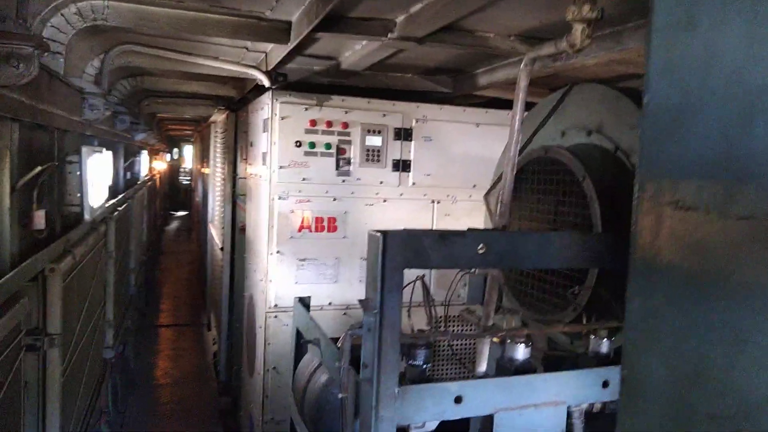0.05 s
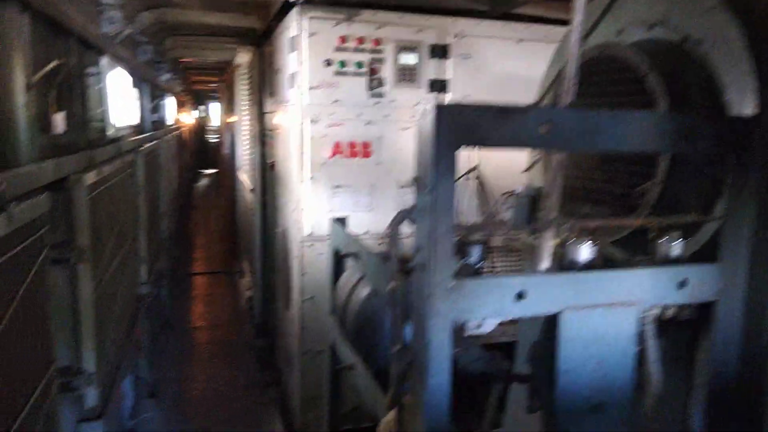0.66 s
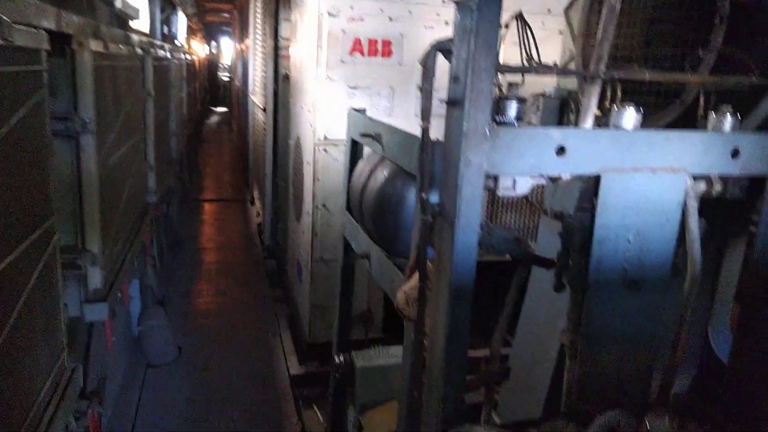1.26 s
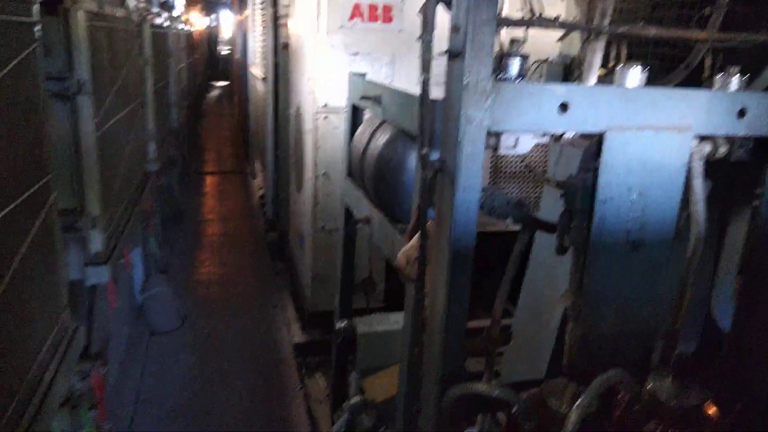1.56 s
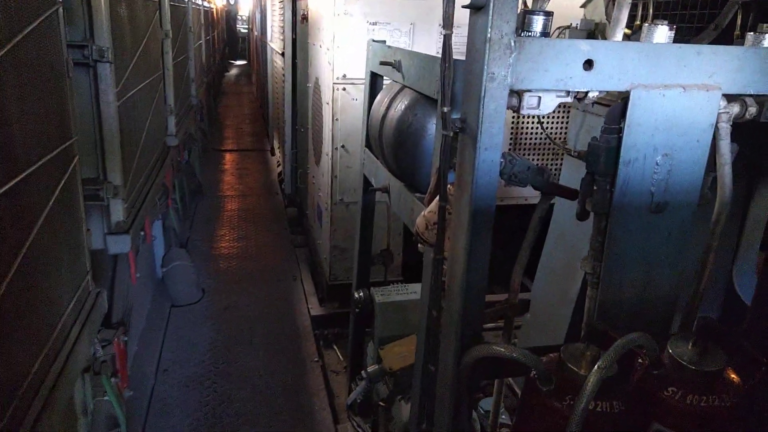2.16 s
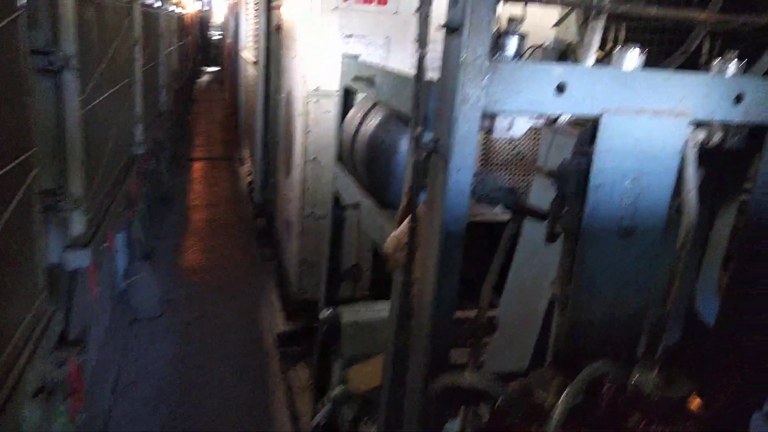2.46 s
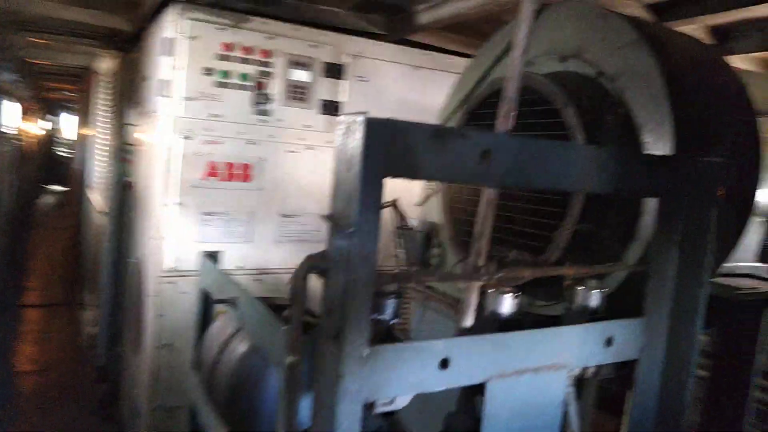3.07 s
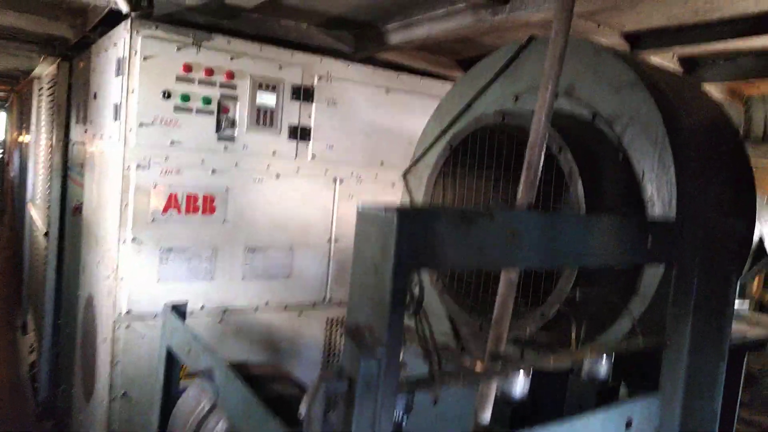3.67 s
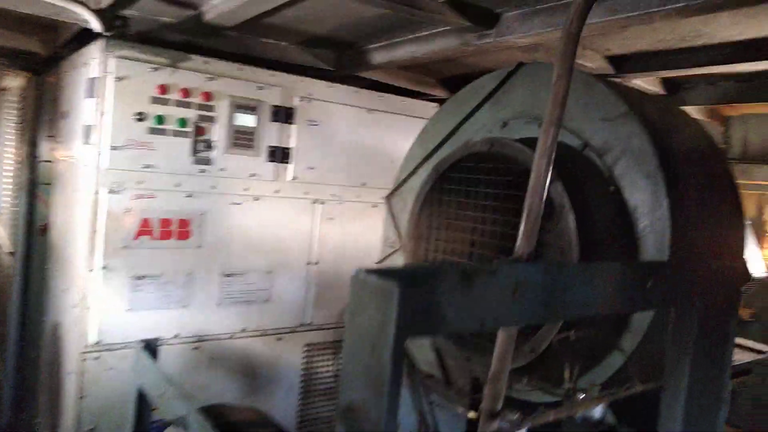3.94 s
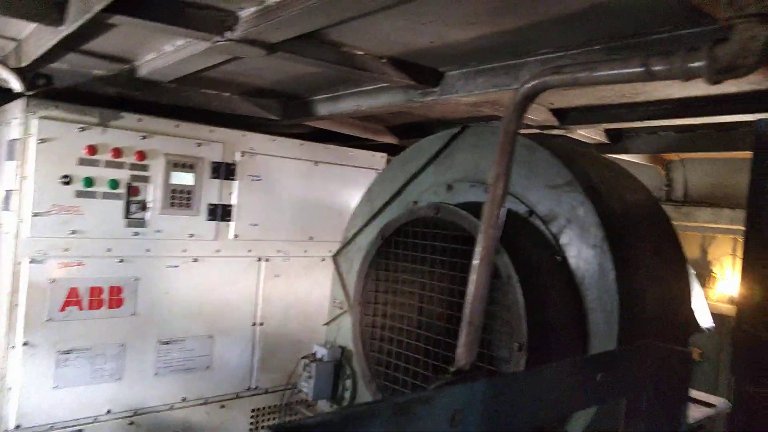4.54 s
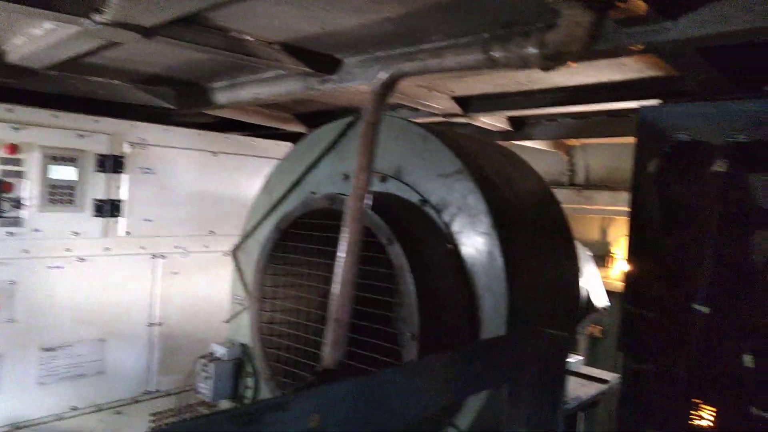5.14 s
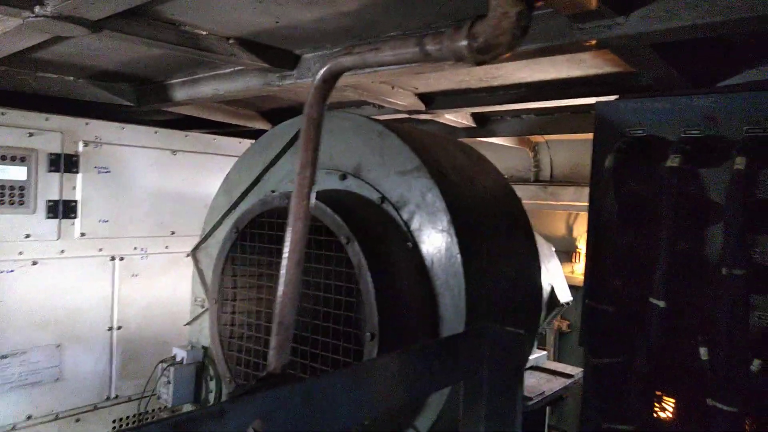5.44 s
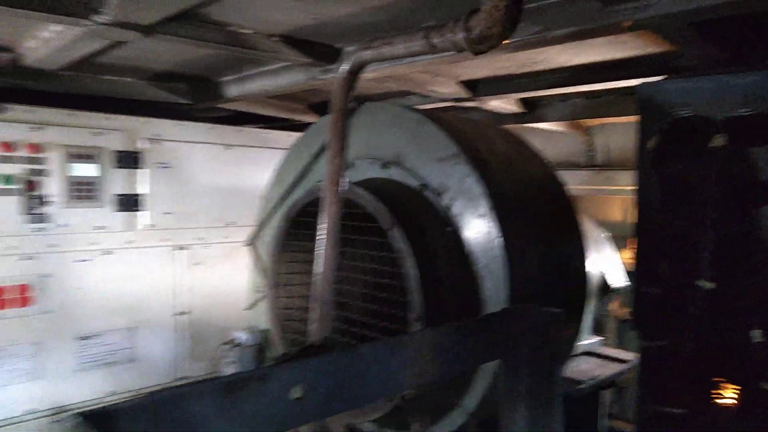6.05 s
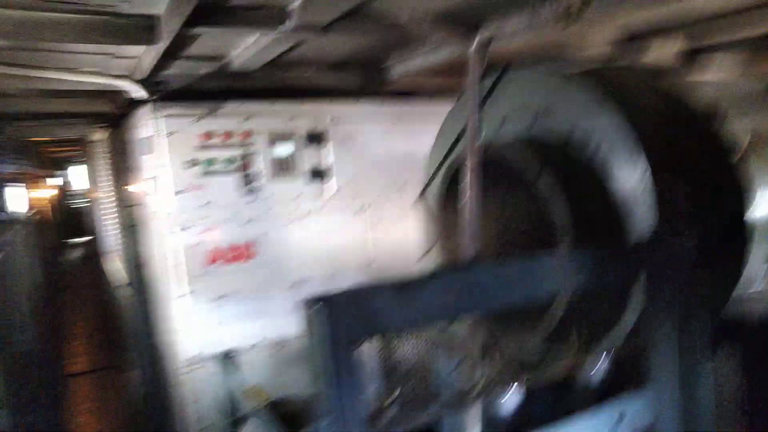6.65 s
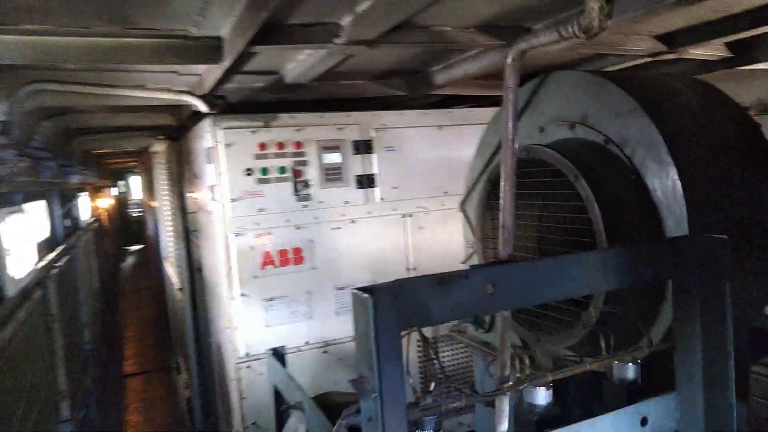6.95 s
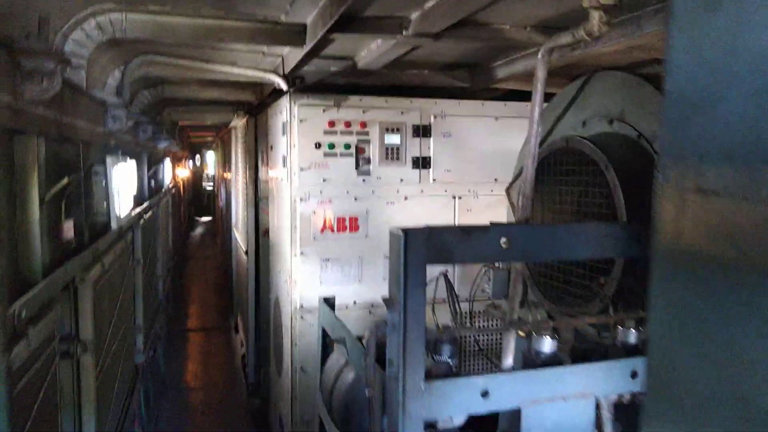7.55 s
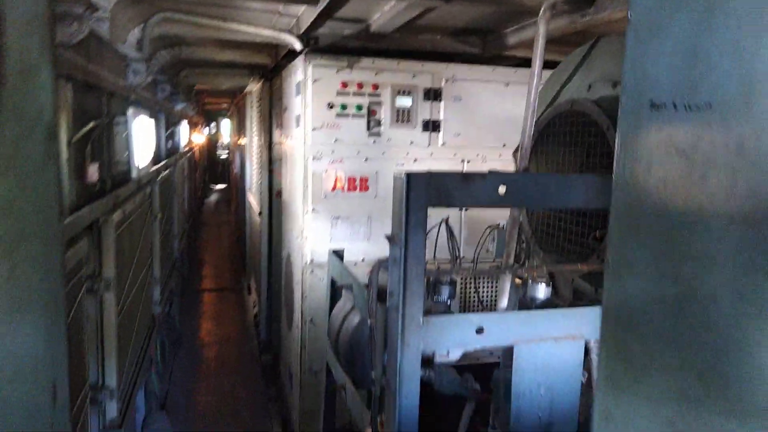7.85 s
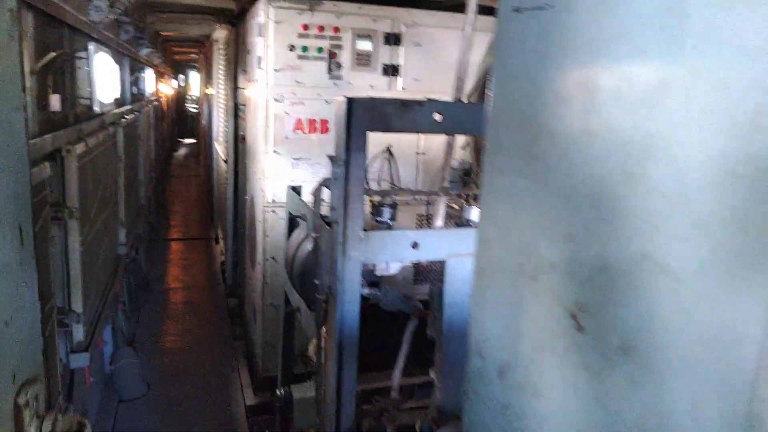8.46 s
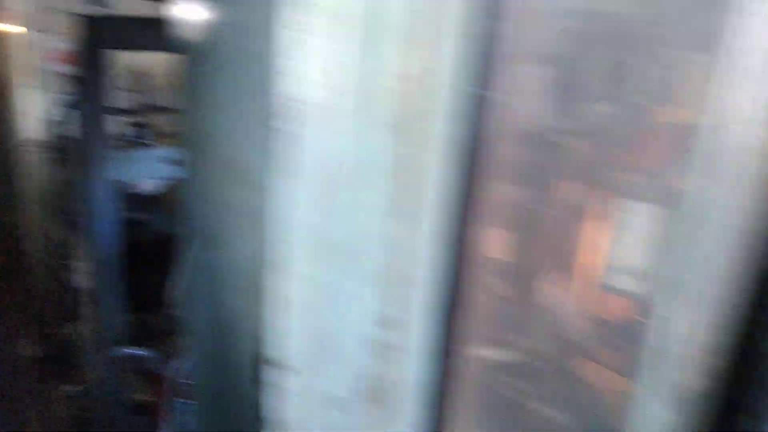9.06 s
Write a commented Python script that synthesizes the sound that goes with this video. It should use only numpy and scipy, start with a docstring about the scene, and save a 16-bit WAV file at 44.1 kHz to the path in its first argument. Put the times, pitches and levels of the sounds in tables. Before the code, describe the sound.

Big blowers roar and drone without a break inside the machine room of an electric locomotive. An air duct whistles unsteadily, swelling and fading. Underneath lie an electrical hum and a gear whine that slowly sinks in pitch, while a loose metal fitting chatters, thin and high. The close, wide stereo microphone is carried about, so the tone of the roar shifts as it moves.

```python
"""Machine room of an electric locomotive

Big blowers roar and drone, and one of their air ducts whistles. Under them lie a mains hum and a
slowly falling gear whine, while a loose metal fitting chatters, thin and high. As the microphone
is carried about, the steel room's standing waves (fixed loud and quiet spots) colour the sound.
A close pair of microphones hears it all, and the stereo image is widened."""
import sys
import numpy as np
from scipy import signal
from scipy.fft import rfft, irfft
from scipy.io import wavfile
from scipy.ndimage import uniform_filter1d

SR = 44100
rng = np.random.default_rng(int(sys.argv[2]) if len(sys.argv) > 2 else 0)


def generate_wav(signal):
    """Clip the signal to [-1, 1] and save it as 16-bit WAV at the path in sys.argv[1]."""
    frames = np.transpose(np.atleast_2d(signal))
    scaled = np.clip(frames, -1, 1) * 32767
    pcm = np.round(scaled).astype(np.int16)
    wavfile.write(sys.argv[1], SR, pcm)


N = 410571
T = np.arange(N) / SR
HZ = np.fft.rfftfreq(N, 1 / SR)
SLOW_T = np.linspace(0, N / SR, 400)  # coarse times [s] for things that change slowly
SHAFT_HZ = 23.56  # turns of the main blower each second


def gain_of(db):
    """Turn decibels into a number to multiply by."""
    return 10 ** (np.asarray(db) / 20)


def unit_rms(x):
    """Scale a signal so that its average strength (rms) is 1."""
    return x / np.sqrt(np.mean(x ** 2) + 1e-20)


def at_time(table, t):
    """Look up a table at the times t, joining its points with straight lines."""
    return np.interp(t, *np.transpose(table))


def at_hz(table, hz):
    """Look up a table by frequency, on a logarithmic scale."""
    f, value = np.transpose(table)
    return np.interp(np.log(hz + 1), np.log(f + 1), value)


def swing(table, t):
    """How far a table is above or below its average at the times t."""
    value = at_time(table, t)
    return value - value.mean()


def bell(hz, centre, width):
    """The peak of one resonance: 1 at its centre, less on either side."""
    return 1 / (1 + (2 * (hz - centre) / width) ** 2)


def band(hz, centre, width):
    """A flat-topped hump over frequency, 1 at its centre."""
    return np.exp(-(2 * (hz - centre) / width) ** 4 / 2)


def drift(top_hz):
    """A smooth random wobble, made of slow waves no faster than top_hz."""
    speeds = top_hz * np.geomspace(.1, 1, 12)[:, None]
    return unit_rms(np.sin(2 * np.pi * (speeds * SLOW_T + rng.random(speeds.shape))).sum(0))


def patches(shape, bins, frames):
    """Smooth random patches over frequency (bins) and time (frames)."""
    field = rng.standard_normal(shape)
    for _ in range(2):
        field = uniform_filter1d(field, bins, 0, mode="wrap")
        field = uniform_filter1d(field, frames, 1, mode="wrap")
    return unit_rms(field)


# The walk up to the blower's air inlet and back: (time [s], nearness [0-1])
NEARNESS = [(0, 0.16), (1, 0.3), (2.5, 0.57), (3.3, 1), (4.1, 0.4), (5.1, 0.78), (6.0, 0.77), (6.45, 0.97),
            (6.95, 0.5), (8.4, 0.02), (9.31, 0.04)]
# The microphone dips toward the floor and rises again: (time [s], lowness [0-1])
LOWNESS = [(0, 0.03), (.55, 0.6), (1.5, 1), (1.95, 0.9), (3, 1), (3.8, 0.5), (4.9, 0.3), (7, 0),
           (8.5, 0.28), (9.31, 0.3)]
# The microphone turns toward the inlet, then away: (time [s], facing [0-1])
FACING = [(0, 0.4), (2.5, 0), (3.2, 0.54), (4.1, 0.5), (4.7, 0.94), (5.3, 0.67), (6.2, 1), (6.65, 0.4),
          (7, 0.1), (9.31, .1)]
# Standing waves: (frequency [Hz], width [Hz], change from far to near [dB], from high to low [dB])
STANDING_WAVES = [(136, 52, -5.5, -4.5), (182.6, 12, -3, -5), (210, 30, -1, 2), (240, 37, -12.5, -4),
                  (331, 44, -4, 18.5), (428, 19, -8, -1), (670, 88, 3.5, -2), (740, 26, -5, 1),
                  (799, 27, -1, -5.5), (983, 37, 5, -14.5), (1137, 95, 4.5, -3)]
# Drones that the inlet beams forward: (frequency [Hz], width [Hz], boost on turning to face it [dB])
INLET_DRONES = [(485, 39, 11.5), (693, 136, 3.5)]
# How the singing duct swells and fades, scaled where used: (time [s], relative level [dB])
DUCT_SONG = [(0.0, -20), (0.37, -23.5), (0.75, -25), (0.85, -15.5), (1.5, -17.5), (2.0, -23.5), (2.65, -27),
             (2.8, -15), (2.95, -16.5), (3.15, -25), (3.64, -16.5), (4.29, -25), (5.51, -21), (6.26, -19.5),
             (6.45, -29), (7.11, -27), (8.3, -25.5), (8.5, -18), (8.81, -15.5), (9.29, -18.5)]
# The same for a rush of air just above it in pitch: (time [s], relative level [dB])
DUCT_RUSH = [(0.0, -21), (0.41, -18.5), (3.16, -18.5), (3.71, -14), (4.29, -15), (4.9, -21), (8.2, -20.5),
             (8.81, -20.5), (9.29, -24)]


def colour_shift_db(t, hz):
    """Standing waves and inlet drones follow the microphone; the duct's song and rush come and go."""
    near, low = swing(NEARNESS, t), swing(LOWNESS, t)
    waves_db = sum(band(hz, f, width) * (near_db * near + low_db * low)
                   for f, width, near_db, low_db in STANDING_WAVES)
    inlet_db = swing(FACING, t) * sum(db * band(hz, f, width) for f, width, db in INLET_DRONES)
    song_db = .59 * swing(DUCT_SONG, t) * band(hz, centre=819, width=45)
    rush_db = .95 * swing(DUCT_RUSH, t) * band(hz, centre=903, width=105)
    return waves_db + inlet_db + song_db + rush_db


# The two microphones face different machines: (frequency [Hz], left minus right [dB])
BALANCE = [(100, 1), (220, -1.5), (350, -3), (500, -4.5), (800, -3.5), (1200, -1), (1800, 4), (3000, 9.5),
           (4300, 2.5), (6000, 9.5), (8000, -3), (10400, -3), (12500, -2), (15000, 5)]
# How far a tone on the left runs ahead of the right: (frequency [Hz], lead [radians])
LEFT_LEAD = [(70, 1.9), (95, 1.1), (165, 1.06), (210, 0.08), (1000, 0.27)]


def tone(cycles, hz, db, echo=.35):
    """One tone in stereo. Its echoes add and cancel as the microphone moves, more so for short waves."""
    shortness = np.sqrt(min(hz, 1000) / 500)
    echoes = echo * (drift(1.3) + 1j * drift(1.3))  # complex numbers hold both strength and phase
    turbulence = .17 * (drift(14) + 1j * drift(14))
    sway = 1 + shortness * (echoes + turbulence) / np.sqrt(2)
    strength = np.sqrt(2) * gain_of(db) * sway / np.sqrt(np.mean(abs(sway) ** 2))
    lead = at_hz(LEFT_LEAD, hz) + .65 * shortness * drift(.475)
    wave = np.exp(2j * np.pi * (cycles + rng.random()))
    sides = [strength * gain_of(side * at_hz(BALANCE, hz)) * np.exp(1j * side * lead)
             for side in (.5, -.5)]
    return np.array([(np.interp(T, SLOW_T, side) * wave).real for side in sides])


# Steady tones of the transformer and small fans: (frequency [Hz], level [dB])
HUM_TONES = [(100.1, -60), (131.7, -73), (300.1, -39.5), (394.9, -59), (996, -45), (1457, -47)]


def hum(room_share=.28):
    """The transformer and small fans stand elsewhere, so the standing waves sway them less."""
    return sum(tone(hz * T, hz, db + room_share * colour_shift_db(SLOW_T, hz)) for hz, db in HUM_TONES)


# How often the gear teeth meet: (time [s], rate [Hz])
TOOTH_RATE = [(0, 276), (2, 270.5), (5, 263), (7, 258), (9.31, 253)]
# How loud the gears are: (time [s], level [dB])
GEAR_LEVEL = [(0, -36), (.7, -32.5), (1.6, -28), (2.6, -37), (3.8, -46), (5, -37), (6, -39), (6.8, -29),
              (7.5, -41), (8.2, -31), (9.31, -54)]
# The tones in the whine: (multiple of the tooth rate, relative level [dB])
GEAR_TONES = [(1, 0), (2, -6), (3, -7)]


def gear_whine():
    """Gear teeth meet so fast that they make a tone, which sinks as the train slows."""
    cycles = np.cumsum(at_time(TOOTH_RATE, T)) / SR
    level_db = at_time(GEAR_LEVEL, SLOW_T)
    start_hz = TOOTH_RATE[0][1]
    return sum(tone(k * cycles, k * start_hz, level_db + db) for k, db in GEAR_TONES)


# Taps of the loose fitting at set times: (time [s], relative level [dB])
SET_TAPS = [(0.0558, -26), (0.2465, -25), (0.2952, -25), (0.385, -28), (0.5501, -27), (0.6439, -27),
            (0.7307, -29), (0.921, -28), (1.0894, -30), (1.1533, -27), (1.2406, -29), (1.3224, -26),
            (1.5943, -25), (1.6531, -26), (1.7679, -26), (1.8552, -27), (2.0053, -24), (2.1071, -24),
            (2.163, -28), (2.5975, -27), (2.701, -24), (2.7606, -30), (2.868, -29), (3.0465, -28),
            (3.0859, -22), (3.2256, -24), (3.49, -29), (3.578, -24), (3.6531, -30), (3.917, -26),
            (3.9973, -24), (4.0781, -28), (4.5456, -25), (4.6284, -32), (4.7411, -31), (4.83, -28),
            (5.075, -34), (5.222, -28), (5.3153, -31), (5.486, -29), (5.5717, -35), (5.6565, -33),
            (5.8192, -26), (5.9065, -24), (6.0716, -28), (6.1589, -28), (6.3101, -32), (6.373, -25),
            (6.4577, -30), (6.8828, -28), (6.9721, -32), (7.0559, -31), (7.138, -27), (7.416, -28),
            (7.4744, -35), (7.7094, -28), (7.8, -28), (8.0326, -30), (8.115, -25), (8.2008, -23),
            (8.2881, -26), (8.3719, -28), (8.4786, -29), (8.6916, -29), (8.747, -24.5), (8.8643, -23),
            (8.9241, -26), (9.1182, -34), (9.2638, -26)]


def fitting_taps(every_turns=1.9, slip_turns=.2, fill_db=-28.5, spread_db=1.3):
    """List the set taps, with similar taps filling the gaps about every second turn of the shaft."""
    set_times = [s for s, _ in SET_TAPS]
    times = np.concatenate([np.linspace(a, b, round((b - a) * SHAFT_HZ / every_turns) + 1)[1:-1]
                            for a, b in zip(set_times, set_times[1:])])
    slip, force = rng.standard_normal((len(times), 2)).T
    fill_taps = zip(times + slip * slip_turns / SHAFT_HZ, fill_db + spread_db * force)
    return list(SET_TAPS) + list(fill_taps)


# Where the fitting rings: (frequency [Hz], width [Hz], relative level [dB])
FITTING_RINGS = [(4400, 410, 4.5), (6360, 110, 4.5), (11200, 1000, -6.5), (12800, 400, -4),
                 (13260, 370, -2.5), (14000, 400, -5), (14300, 190, 4)]


def chatter(rise_s=.008, fade_60db_s=.15, scatter_db=2, trim_db=-1.5):
    """The blower shakes a loose fitting; each tap scrapes it into a short ring that the room draws out."""
    t = np.arange(SR // 4) / SR
    hz = np.fft.rfftfreq(len(t), 1 / SR)
    out = np.zeros((2, N))
    for start_s, db in fitting_taps():
        detune = 1 + .01 * rng.standard_normal()  # it never lands in quite the same place
        favoured_hz = 13700 + 550 * rng.standard_normal()  # the spot it hits favours some rings
        age = t * rng.uniform(.75, 1.3)
        envelope = (1 - np.exp(-age / rise_s)) * gain_of(-60 * age / fade_60db_s)
        power = sum(gain_of(ring_db + scatter_db * rng.standard_normal()) ** 2
                    * bell(hz, f * detune, width) for f, width, ring_db in FITTING_RINGS)
        power *= .98 + bell(hz, favoured_hz, width=1700)
        noise = rfft(rng.standard_normal((2, len(t))))
        ring = unit_rms(irfft(noise * np.sqrt(power), len(t)))
        tap = gain_of(db + trim_db) * ring * envelope / envelope.max()
        slot = out[:, max(round(start_s * SR), 0):][:, :len(t)]
        slot += tap[:, :slot.shape[1]]
    return out


# The whistle's pitch shifts with the draught: (time [s], pitch [Hz])
WHISTLE_PITCH = [(.9, 818), (1.5, 811), (2.85, 809), (3.6, 821), (6, 812), (8.7, 815)]


def duct_whistle(waver_hz=3.5, middle_db=-30.5):
    """An unsteady tone that breaks out when the air drives the singing duct hard."""
    hz = at_time(WHISTLE_PITCH, T) + waver_hz * np.interp(T, SLOW_T, drift(12))
    level_db = middle_db + 1.45 * swing(DUCT_SONG, SLOW_T)
    return tone(np.cumsum(hz) / SR, hz.mean(), level_db, echo=0)


# The overall shape of the roar: (frequency [Hz], level [dB per Hz])
ROAR_SHAPE = [(25, -88), (65, -76.5), (105, -58), (220, -53.5), (390, -57.5), (450, -48), (900, -50.5),
              (1250, -58.5), (2300, -61.5), (3700, -62), (4900, -68), (5500, -66.5), (6200, -66),
              (9000, -73.5), (12000, -74), (14400, -76), (15200, -86)]
# Resonances of the ducts and casings: (frequency [Hz], width [Hz], boost or cut [dB])
DUCT_RESONANCES = [(476, 13, 0), (490, 11, 0), (698.5, 32, 6), (780, 20, 3.5), (812, 37, 3.5), (840, 38, 2),
                   (1040, 60, -2.5), (1137, 27, 5), (1816, 133, -9), (1960, 374, 6), (2820, 16, 7),
                   (3250, 24, 5), (6000, 180, 3.5), (7750, 130, 6), (12050, 220, 6)]
# How alike the air sounds on the left and right: (frequency [Hz], likeness [0-1])
LIKENESS = [(25, 0.5), (70, 0.1), (110, 0.15), (200, 0), (350, 0.2), (520, 0), (800, 0.79), (1200, 0),
            (1800, 0.09), (15000, 0)]


def air_roar(turns, throb_db=.88, flutter_db=.98, hiss_hz=2200):
    """Air tumbles through the ducts; its hiss flutters, and throbs with each turn of the blower."""
    left, other = rfft(rng.standard_normal((2, N))) * np.sqrt(SR / 2)
    alike = np.clip(at_hz(LIKENESS, HZ), -1, 1)
    right = alike * left + np.sqrt(1 - alike ** 2) * other
    sides = gain_of(np.array([[.5], [-.5]]) * at_hz(BALANCE, HZ))
    sides /= np.sqrt((sides ** 2).mean(0))
    ducts_db = sum(db * bell(HZ, hz, width) for hz, width, db in DUCT_RESONANCES)
    spectrum = np.array([left, right]) * gain_of(at_hz(ROAR_SHAPE, HZ) + ducts_db) * sides
    treble = HZ ** 4 / (HZ ** 4 + hiss_hz ** 4)
    angle = 2 * np.pi * turns
    throb = np.sin(angle) + .4 * np.sin(2 * angle) + .4 * np.cos(3 * angle)
    hiss_db = throb_db * throb + flutter_db * np.interp(T, SLOW_T, drift(14))
    return irfft(spectrum * (1 - treble), N) + irfft(spectrum * treble, N) * gain_of(hiss_db)


def walk_through_room(roar):
    """Standing waves colour the roar; higher up, crowded echoes leave a slowly shifting ripple."""
    hz, t, spectra = signal.stft(roar, SR, nperseg=4096, noverlap=3072)
    hz, shape = hz[:, None], spectra.shape[1:]
    ripple_db = 1.9 * patches(shape, bins=2, frames=36) + .8 * patches(shape, bins=10, frames=40)
    crowding = np.clip(hz / 1000, 0, 1)
    spectra *= gain_of(colour_shift_db(t, hz) + crowding * ripple_db)
    return signal.istft(spectra, SR, nperseg=4096, noverlap=3072)[1][:, :N]


# The main blower's weaker tones: (multiple of the shaft rate, relative level [dB])
WEAK_TONES = [(3, -61), (4, -41), (5, -34.5), (7, -36), (10, -37.5), (11, -42.5), (12, -50), (15, -38.5),
              (16, -38), (17, -41.5), (18, -33.5), (20, -37.5), (23, -35.5), (24, -50), (25, -36.5),
              (27, -37.5), (29, -36.5), (30, -35.5), (31, -47), (33, -30.5), (34, -33.5), (35, -35.5),
              (36, -37), (37, -37.5), (38, -39.5), (39, -40.5), (40, -41)]
# Its strongest tones, which drop out as the microphone crosses their quiet spots.
# For each multiple of the shaft rate: (time [s], relative level [dB])
STRONG_TONES = {6: [(0.0, -44), (3.2, -49), (4.5, -43), (6.5, -48), (9.3, -28)], 8: [(0.0, -28.5),
                (1.5, -46), (2.9, -46), (3.5, -32.5), (6.1, -33), (6.7, -27.5), (8.4, -29.5), (8.7, -41),
                (9.3, -29)], 9: [(0.0, -33), (0.3, -29), (0.8, -32), (2.4, -28), (3.4, -37), (6.9, -29),
                (8.0, -34), (8.4, -43), (9.3, -38)], 13: [(0.0, -35.5), (1.1, -28), (1.8, -35), (3.1, -30),
                (3.8, -28), (4.9, -33.5), (7.0, -48), (8.3, -31.5), (9.3, -33.5)], 14: [(0.0, -47),
                (1.0, -25), (1.7, -32), (1.9, -45), (2.1, -32), (3.1, -26), (3.7, -30), (3.9, -40),
                (7.2, -40), (7.5, -44.0), (9.3, -33)], 19: [(0.0, -39), (2.6, -31), (2.95, -44), (3.3, -30),
                (4.4, -35), (6.7, -31), (7.2, -38), (9.3, -33)], 21: [(0.0, -30.5), (1.0, -30), (1.3, -37),
                (1.6, -31), (1.9, -33), (2.3, -30), (2.6, -30), (2.9, -43), (3.5, -27.5), (5.3, -22),
                (6.6, -24), (6.95, -30), (8.5, -36), (9.3, -27.5)], 22: [(0.0, -33), (0.8, -41), (1.1, -31),
                (1.7, -32), (1.9, -39), (2.1, -41), (3.0, -23.5), (3.7, -29), (3.9, -36), (4.4, -27.5),
                (5.9, -24.5), (6.8, -42), (7.9, -30.5), (8.5, -31.5), (9.3, -32)], 26: [(0.0, -39),
                (0.7, -44), (2.4, -32), (3.5, -30), (4.1, -31), (4.9, -33), (5.6, -59), (6.7, -35),
                (7.2, -46), (9.3, -27.5)], 28: [(0.0, -34), (0.8, -33), (1.1, -24), (1.9, -45),
                (3.4, -30.5), (3.9, -35), (5.2, -24.5), (5.5, -35), (5.9, -22), (6.8, -51), (7.7, -31.5),
                (9.3, -31)], 32: [(0.0, -29), (0.9, -43), (1.4, -27), (2.8, -26.5), (3.3, -40), (3.9, -39),
                (6.0, -26), (6.7, -47), (7.4, -30), (8.0, -35), (8.3, -30), (8.5, -27), (9.3, -25)]}


def blower_drone(turns, weak_trim_db=-2, strong_trim_db=-1):
    """The spinning blower sounds at multiples of its shaft rate; the top ones sink into the roar."""
    top_tones = [(WEAK_TONES[-1][0] + 1 + k, -42 - .54 * k) for k in range(16)]
    out = np.zeros((2, N))
    for k, db in list(WEAK_TONES) + top_tones:
        level_db = db + weak_trim_db + colour_shift_db(SLOW_T, k * SHAFT_HZ)
        out += tone(k * turns, k * SHAFT_HZ, level_db, echo=.7)
    for k, swell in STRONG_TONES.items():
        out += tone(k * turns, k * SHAFT_HZ, strong_trim_db + at_time(swell, SLOW_T), echo=0)
    return out


def scene():
    """Add up all the machines; roar and drone share one shaft, whose speed wanders very slightly."""
    shaft_hz = SHAFT_HZ * (1 + .00084 * np.interp(T, SLOW_T, drift(.701)))
    turns = np.cumsum(shaft_hz) / SR
    blower = walk_through_room(air_roar(turns)) + blower_drone(turns)
    return blower + duct_whistle() + hum() + gear_whine() + chatter()


# How much of the other side the stereo widener takes away: (frequency [Hz], share [0-1])
WIDENER_SHARE = [(500, 0.0), (800, .25), (1200, .65), (1900, .88), (2450, .94), (3650, .82), (4900, .99),
                 (6100, .87), (7350, .87), (8550, .8), (9800, .89), (11000, .84), (12300, .86), (14500, .6)]
# The left output's level against the right: (frequency [Hz], left minus right [dB])
OUTPUT_BALANCE = [(500, 0), (850, -2), (1400, 0), (1750, 5), (2300, 0), (3300, -2.2), (4300, -1.4),
                  (5400, -1.6), (6300, -2.6), (9800, 0), (14000, -1.5)]


def record(dry, delay_s=18.1 / SR, ceiling=.92, top_hz=15450):
    """Widen the stereo by subtracting the other side's delayed treble; soften peaks, cut the very top."""
    spectrum = rfft(dry)
    share = np.clip(at_hz(WIDENER_SHARE, HZ), 0, 1)
    other_side = spectrum[::-1] * np.exp(-2j * np.pi * HZ * delay_s)
    wide = (spectrum - share * other_side) / np.sqrt(1 + share ** 2)
    sides = gain_of(np.array([[.5], [-.5]]) * at_hz(OUTPUT_BALANCE, HZ))
    stereo = irfft(wide * sides, N)
    softened = stereo / (1 + (stereo / ceiling) ** 12) ** (1 / 12)
    low_pass = signal.firwin(511, top_hz, window=("kaiser", 9), fs=SR)
    return signal.oaconvolve(softened, low_pass[None], "same")


dry = scene()
out = record(dry)
generate_wav(out)
```